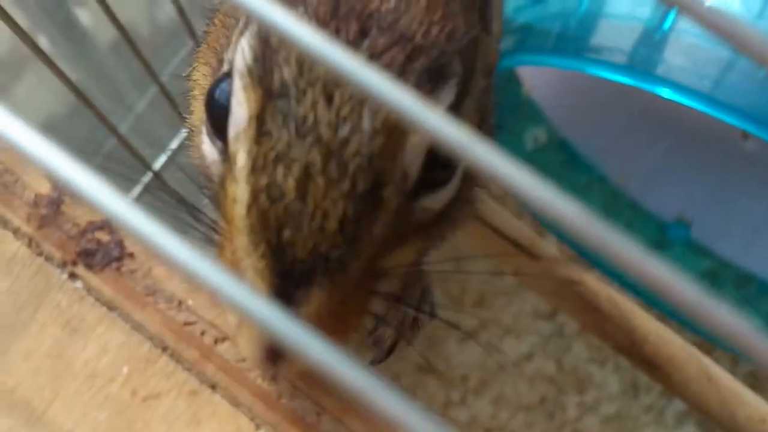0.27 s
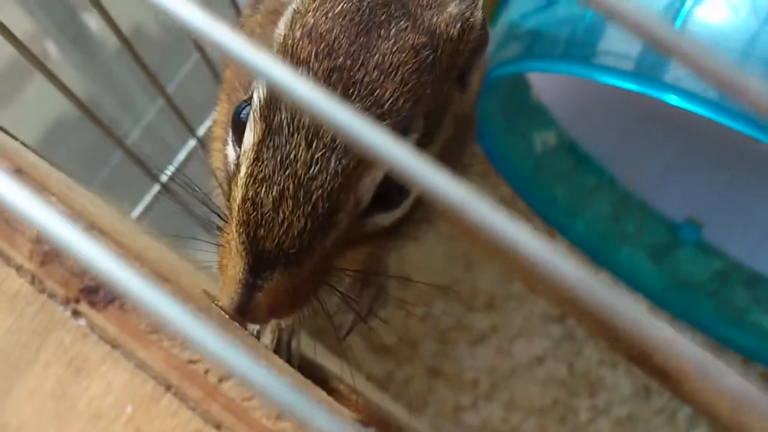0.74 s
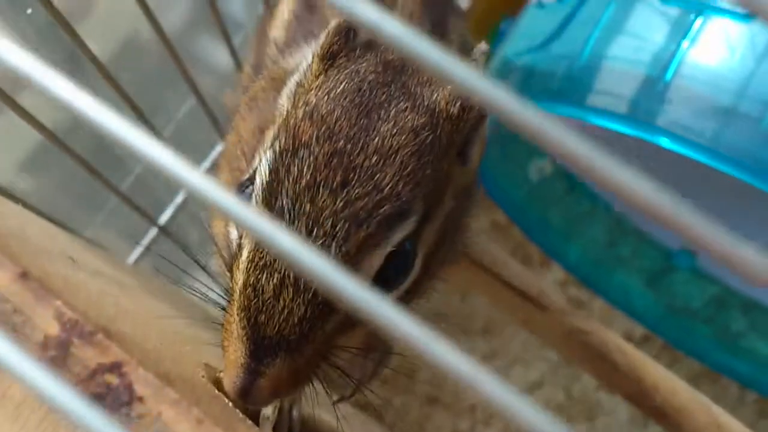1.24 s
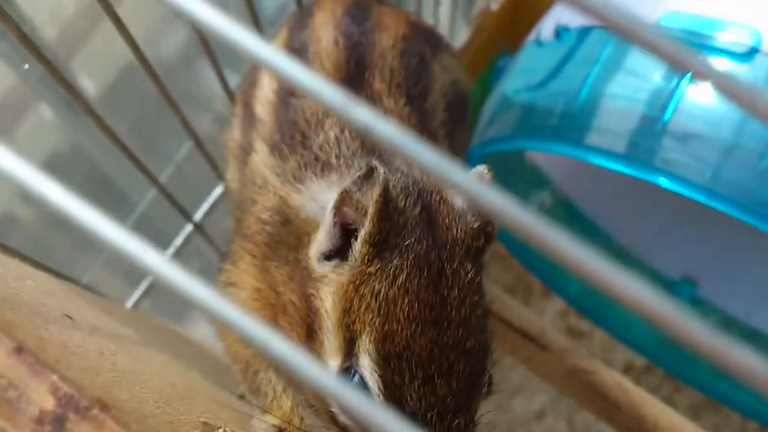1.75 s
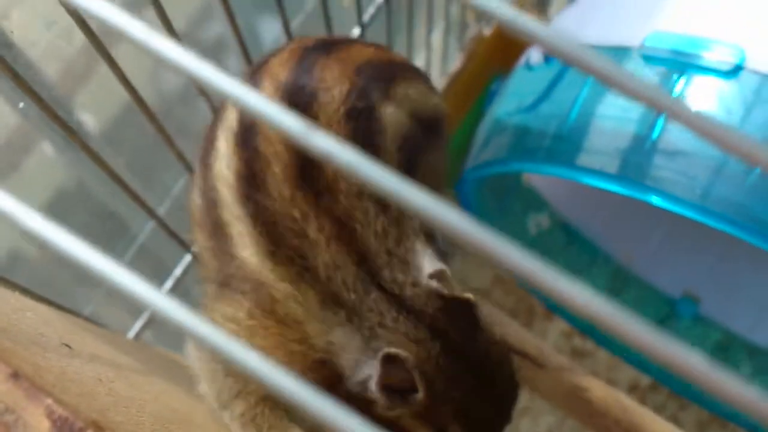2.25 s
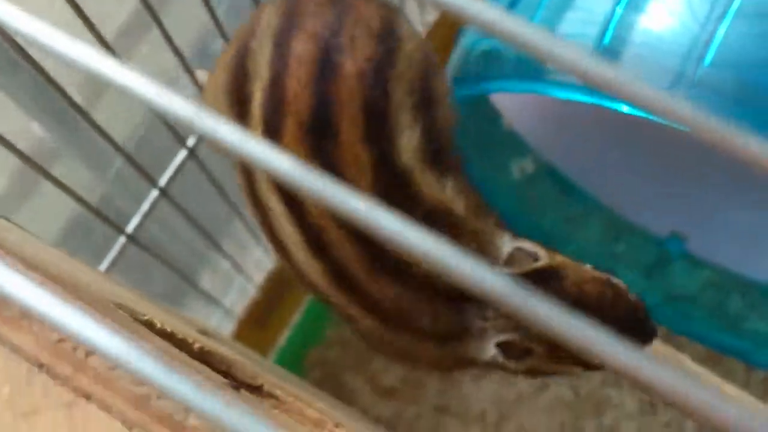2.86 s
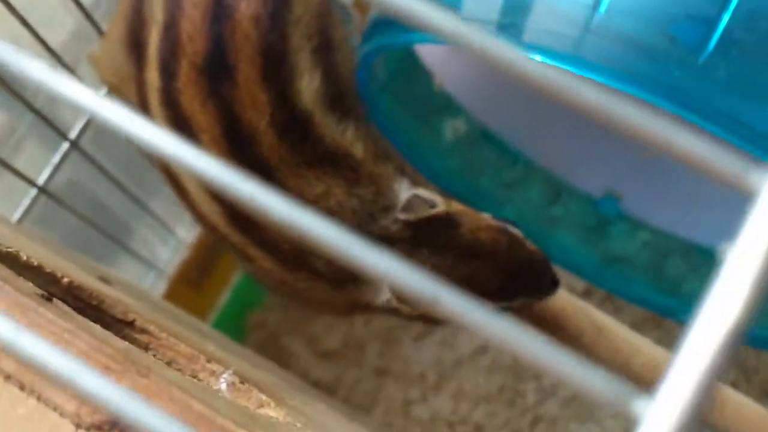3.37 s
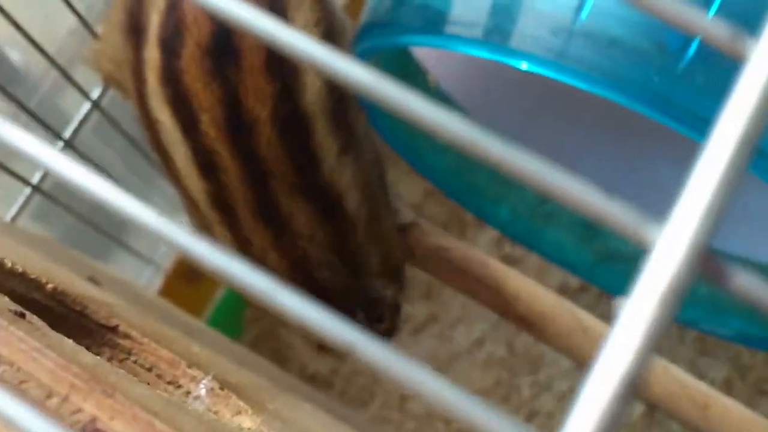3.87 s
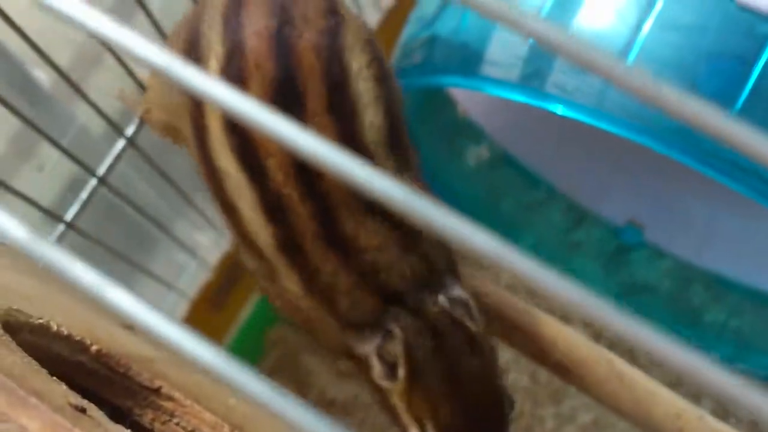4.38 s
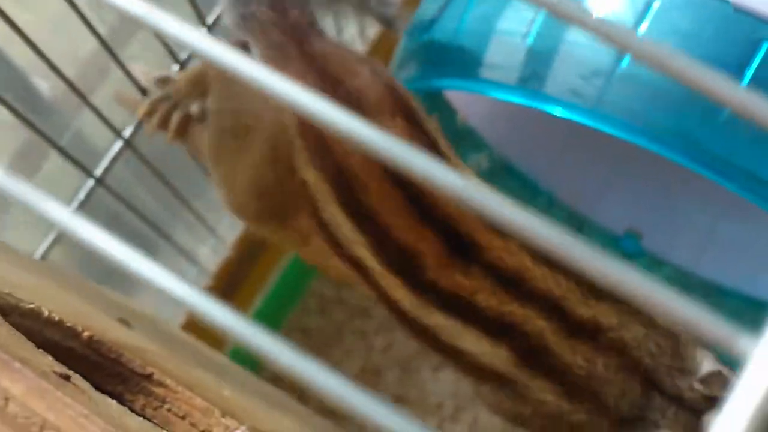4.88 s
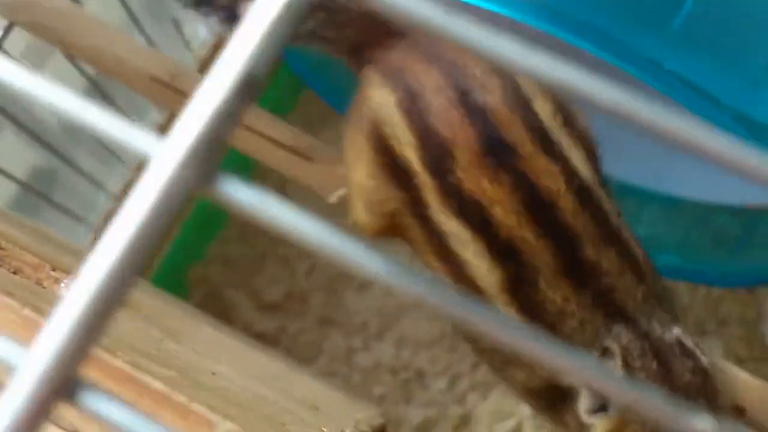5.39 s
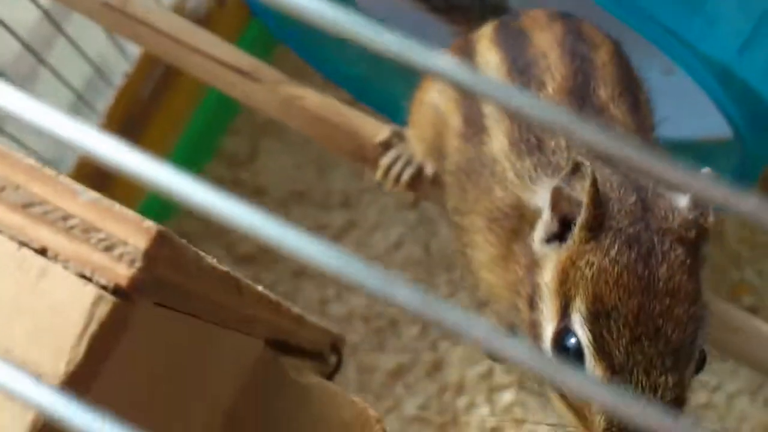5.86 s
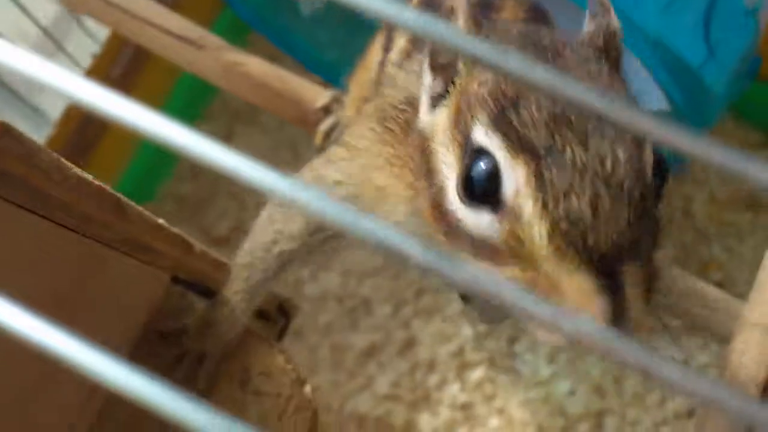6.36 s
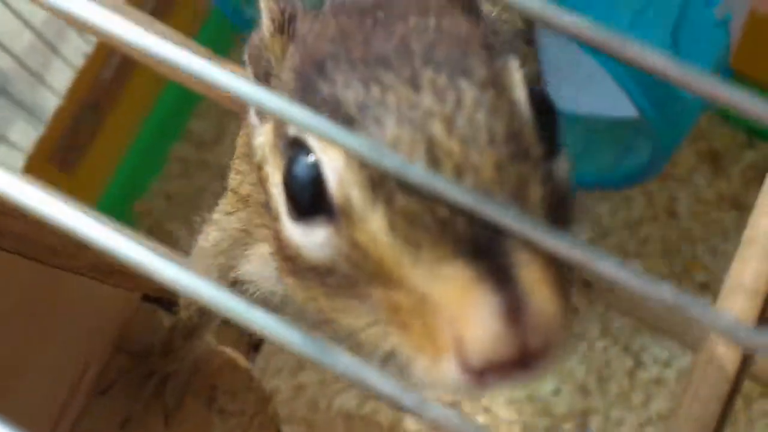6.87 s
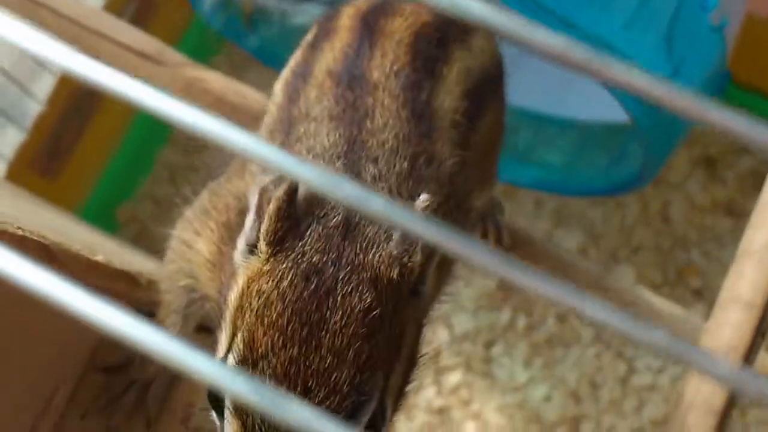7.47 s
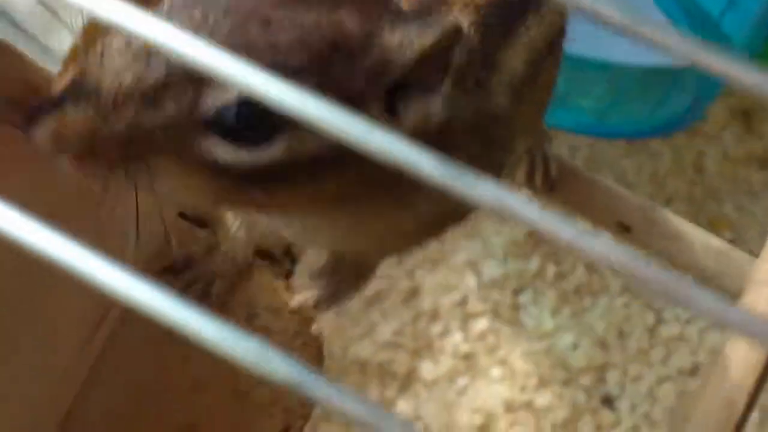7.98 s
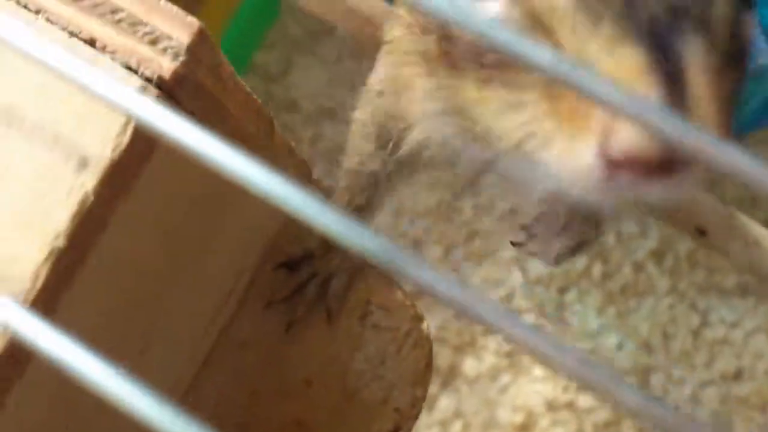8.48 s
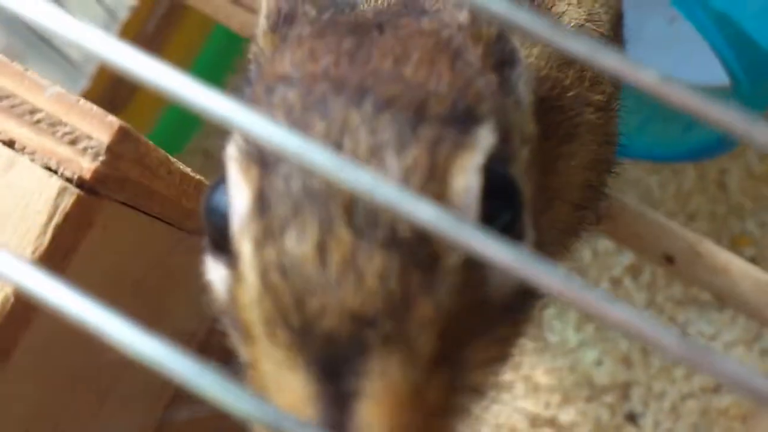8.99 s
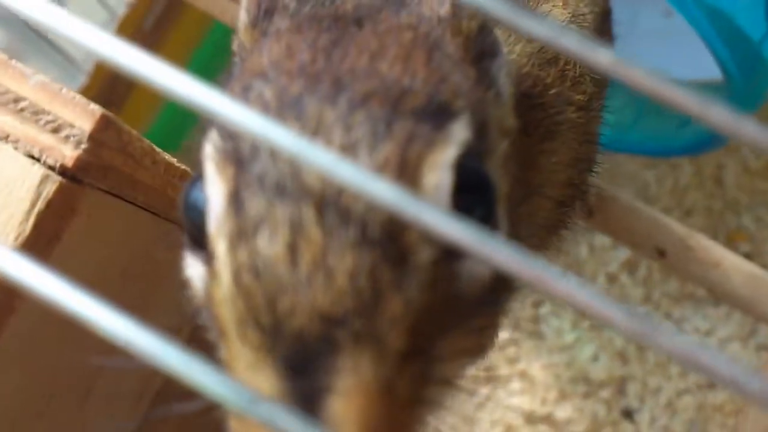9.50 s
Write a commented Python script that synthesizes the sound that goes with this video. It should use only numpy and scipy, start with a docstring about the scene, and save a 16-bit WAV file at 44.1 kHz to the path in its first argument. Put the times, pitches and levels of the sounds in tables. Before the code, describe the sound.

An agitated small rodent calls near the microphone, alternating noisy throat rasps with thin, bending squeaks. Calls arrive in irregular clusters, with near-silent pauses showing low room rumble, hiss and very faint hum. Soft body bumps and weak whines sit in the lulls. The loudest squeak comes past midway; strong rasps and crisp claw clicks dominate later, ending on faint whines and a couple of squeaks. The small room sounds close and slightly lively.

```python
"""Chipmunk scolding in a wire cage

Close by in a small room, harsh rasping chirps alternate with gliding squeaks and a few faint whines.
Rasps are noise puffs from a slapping throat; squeaks and whines are overtone stacks on bending pitch paths.
Claws and teeth tick as short noise cracks and the body bumps the floor as decaying sines.
Cage walls and room answer with decaying noise, over drifting rumble and hiss and a wavering low hum.
"""
import sys
import numpy as np
from scipy import signal
from scipy.fft import rfft, irfft, next_fast_len
from scipy.io import wavfile
from scipy.ndimage import uniform_filter1d, minimum_filter1d, map_coordinates

SR = 44100
rng = np.random.default_rng(int(sys.argv[2]) if len(sys.argv) > 2 else 0)


def inscribe(sig):
    """Save sig as 16-bit PCM at rate SR to the path in sys.argv[1].

    A 1-D sig is mono; a 2-D sig holds one channel per row.
    Samples are clipped to [-1, 1] before scaling.
    """
    pcm = np.round(np.clip(np.atleast_2d(sig).T, -1, 1) * 32767)
    wavfile.write(sys.argv[1], SR, pcm.astype(np.int16))


N = 429534
TOP_HZ = 16000  # upper limit of the overtones and of the whole sound


def amp(db):
    """Decibels to gain."""
    return 10 ** (np.asarray(db) / 20)


def unit(x):
    """Scale to rms 1."""
    return x / np.sqrt(np.mean(x ** 2) + 1e-20)


def along(points, hz):
    """(Hz, value) points on a log axis."""
    f, v = np.transpose(points)
    return np.interp(np.log(hz + 1), np.log(f + 1), v)


def wobble(rate, n):
    """A smooth random curve, rate knots a second."""
    knots = rng.standard_normal(8192)
    return map_coordinates(knots, [np.arange(n) * rate / SR], mode="wrap")


def filtered(x, response):
    """x times a response of frequency."""
    n = x.shape[-1]
    m = next_fast_len(n + 2048)
    return irfft(rfft(x, m) * response(np.fft.rfftfreq(m, 1 / SR)), m)[..., :n]


def add(track, s, x):
    """Mix x into the track at time s."""
    i = max(0, round(s * SR))
    track[i:i + len(x)] += x[:N - i]


def room_air(air_db=-54.5, drift_db=.6, split_hz=1000, waver_db=3):
    """Soft rumble and hiss that drift in level, each on its own, over a wavering hum."""
    # colour of the air noise: f/Hz, relative level/dB
    air_colour = [(12, -20), (20, 11), (81, -9.5), (142, -2), (337, -12), (422, -6), (624, -11.5),
                  (900, -7.5), (2140, -16.5), (6910, -22.5), (9000, -16.5), (16000, -32)]
    # likeness of the two channels: f/Hz, left-right correlation (-1 to 1)
    alike = [(30, 0.92), (250, 0.82), (600, 0.63), (1500, 0.093), (10000, 0.021)]
    # hum tones: f/Hz, level around which each wavers/dB rms
    hum_tones = [(120, -73.5), (180, -78.5)]

    def mid_side(hz):
        # more side against mid makes the channels less alike
        turn = np.arccos(np.clip(along(alike, hz), -1, 1)) / 2
        return amp(along(air_colour, hz)) * [np.cos(turn), np.sin(turn)]

    mid, side = filtered(rng.standard_normal((2, N)), mid_side)
    air = unit(np.array([mid + side, mid - side]))
    rumble = filtered(air, lambda hz: hz < split_hz)
    hiss = air - rumble
    air = sum(band * amp(drift_db * wobble(3.115, N)) for band in (rumble, hiss))
    t = np.arange(N) / SR
    hum = np.zeros(N)
    for hz, db in hum_tones:
        level = amp(db + waver_db * wobble(12.0, N))
        hum += level * np.sqrt(2) * np.sin(2 * np.pi * hz * t + wobble(2.0, N))
    return amp(air_db) * air + hum


def bumps(decay=0.021, attack=0.00019):
    """The body bumps the cage floor, which gives one dull, short ring: a sine dying away (times in s)."""
    # soft bumps: t/s, source amplitude before the envelope/dB, f/Hz
    thuds = [(1.186, -49, 409), (1.727, -50.5, 206), (2.766, -48, 400), (3.395, -47, 404)]
    out, t = np.zeros(N), np.arange(SR // 5) / SR
    for s, db, hz in thuds:
        envelope = np.exp(-t / decay) * (1 - np.exp(-t / attack))
        add(out, s, amp(db) * np.sin(2 * np.pi * hz * t) * envelope)
    return out


def ticks(decay=0.0023):
    """Each contact of claws or teeth is a dry crack: coloured noise dying in a few milliseconds (decay in s)."""
    # sharp contacts: t/s, source level before the decay/dB rms
    contacts = [(1.707, -41.5), (2.468, -34), (2.817, -38), (4.084, -23), (5.809, -23.5), (7.225, -25.5),
                (7.878, -19.5), (8.049, -23.5), (8.065, -17), (8.07, -17), (8.8895, -19.5), (8.907, -20.5),
                (9.0572, -23.5), (9.0698, -26)]
    # colour of a crack: f/Hz, relative level/dB
    crack_colour = [(400, -30), (1500, 1), (3000, 20), (8500, 17), (11500, -23), (16000, -46)]
    out, t = np.zeros(N), np.arange(SR // 20) / SR
    for s, db in contacts:
        crack = unit(filtered(rng.standard_normal(len(t)), lambda hz: amp(along(crack_colour, hz))))
        add(out, s, amp(db) * crack * np.exp(-t / decay))
    return out


def glides(notes, colour, overtones_db, jitter, flutter_db, rasp_db, attack, release, warble, half_db,
           shiver=0.014, flare_db=-1.5):
    """Notes bend along pitch paths with overtones; strain flutters pitch and size and adds a pulsing hiss."""
    out = np.zeros(N)
    for rough, bright_db, path in notes:
        times, hz, db = np.transpose(path)
        times, rough = np.sort(times), np.clip(rough, 0, 1)
        end = times[-1] + release
        t = np.arange(times[0] - attack, end, 1 / SR)
        n = len(t)
        pitch, level = np.interp(t, times, hz), np.interp(t, times, db)

        # fast jitter and slower warble of the pitch, both growing with roughness
        unsteady = (shiver + rough * jitter) * wobble(1098.0, n)
        unsteady = unsteady + (shiver + rough * warble) * wobble(246.6, n)
        phase = 2 * np.pi * np.cumsum(pitch * np.exp(unsteady)) / SR

        def partial(k):
            # low notes put their overtones into the head's resonances and sound reedier
            resonance = amp(along(colour, k * pitch) - along(colour, pitch))
            return np.sin(k * phase) * resonance * (k * pitch < TOP_HZ)

        # the overtones flare and fade as the vocal folds close more or less tightly
        tone = partial(1)
        for k, overtone_db in enumerate(overtones_db, 2):
            tone = tone + amp(bright_db + overtone_db + flare_db * wobble(112.0, n)) * partial(k)
        # under strain alternate cycles differ, giving a line halfway to the octave
        tone = tone + amp(half_db) * rough * partial(3 / 2)
        tone = tone * np.sqrt(2) * amp(flutter_db * rough * wobble(488, n))

        noise = rng.standard_normal(SR // 2)[:n]
        hiss = unit(filtered(noise, lambda f: amp(along(colour, f)) * (f > pitch.min())))
        pulsing_hiss = amp(rasp_db) * rough ** 2 * hiss * (1 + np.cos(phase))
        # both the fade-in and the fade-out last one attack time
        gate = np.clip(np.minimum(t - t[0], end - t) / attack, 0, 1)
        add(out, t[0], gate * amp(level) * (tone + pulsing_hiss))
    return out


def whines():
    """Low nasal notes: strong overtones shaped by the nose, with slow fades and a noisy rasp under strain."""
    # one note a row: roughness (0-1), overtone strength/dB, path of (t/s, f/Hz, source level/dB)
    nasal_notes = [(.42, 12, [(2.68, 1190, -60), (2.705, 1150, -54), (2.74, 1100, -61)]),
                   (.42, 6, [(2.872, 1090, -52), (2.9, 1010, -49), (2.93, 940, -57)]),
                   (.24, -3, [(3.03, 1680, -52), (3.06, 1400, -56), (3.125, 1320, -55), (3.18, 1500, -54)]),
                   (.26, -4, [(9.045, 1650, -60), (9.15, 1000, -47), (9.21, 1200, -56),
                   (9.222, 2300, -53)]), (.35, -2, [(9.236, 1700, -48), (9.28, 1470, -45),
                   (9.345, 1570, -63)])]
    # resonances of the nose: f/Hz, relative level/dB
    nose = [(1000, -4.5), (1600, -3), (2600, -2.5), (4500, 1.5), (6000, -9), (9000, -6), (16000, -36)]
    return glides(nasal_notes, nose, overtones_db=[-10.5, -11.5, -19.0, -27],
                  jitter=.04, flutter_db=4, rasp_db=17, attack=.014, release=.02, warble=.008, half_db=-3)


def squeaks():
    """Quick gliding cries through the mouth, plus thin whistles that sound inside harsh chirps."""
    # one squeak a row: roughness (0-1), overtone strength/dB, path of (t/s, f/Hz, source level/dB)
    cries = [ (0.246, -1, [(.325, 4050, -30), (.348, 3600, -33), (.362, 2840, -31.5), (.398, 1445, -38)]),
             (0.405, 1, [(.397, 3090, -29.5), (.417, 3470, -35), (.428, 2586, -33), (.438, 2480, -33)]),
             (.14, 2, [(.468, 3150, -29), (.48, 3620, -25), (.5, 3780, -20), (.511, 2880, -24),
             (.535, 2650, -19), (.547, 2300, -27)]), (.7, 5, [(.548, 2540, -27), (.558, 3000, -27)]),
             (0.15, -3, [(.818, 3097, -19), (.835, 2754, -17.5), (.849, 2210, -25.5)]),
             (.3, -3, [(1.405, 3550, -35), (1.415, 3300, -29), (1.419, 2400, -33)]),
             (.11, -1, [(1.424, 2250, -31), (1.452, 2700, -24), (1.48, 3020, -23.5), (1.489, 2700, -24),
             (1.497, 2380, -33), (1.506, 2250, -32)]), (0.16, 10.5, [(1.507, 2130, -41),
             (1.526, 1967, -38)]), (0.24, 6, [(2.008, 3360, -49), (2.027, 1644, -42), (2.04, 1500, -46)]),
             (0.12, 8, [(2.056, 2270, -36), (2.08, 2140, -43.5)]), (0.15, 6, [(2.09, 3400, -36),
             (2.108, 2870, -34), (2.131, 2210, -37.5)]), (0.093, 7.5, [(2.136, 1750, -42),
             (2.165, 1945, -49.5), (2.2, 1664, -49.5), (2.228, 2120, -49)]), (.2, 5, [(2.254, 2340, -35),
             (2.267, 2240, -38)]), (0.13, 8, [(3.43, 3030, -43.5), (3.45, 2890, -48)]),
             (0.41, -10, [(3.466, 1940, -48), (3.479, 3300, -34.5), (3.501, 1484, -43),
             (3.524, 3040, -38)]), (0.074, 6, [(3.527, 2930, -35), (3.548, 3156, -35), (3.575, 2814, -33),
             (3.605, 2910, -28), (3.638, 2660, -29)]), (.35, -6, [(3.643, 2548, -36), (3.665, 2000, -34),
             (3.705, 2260, -26)]), (0.43, 5, [(3.686, 3400, -27), (3.725, 3490, -22)]),
             (0.12, -3, [(4.213, 3180, -32), (4.24, 3140, -46), (4.268, 3100, -30), (4.31, 3130, -41)]),
             (0.14, 4.5, [(5.257, 4540, -43), (5.265, 3170, -37), (5.277, 3120, -26), (5.296, 3050, -31.5),
             (5.32, 2580, -28)]), (.4, -8, [(5.324, 2895, -26), (5.35, 2400, -18)]),
             (0.16, -4, [(5.364, 3097, -6.5), (5.416, 2965, -16)]), (0.19, 5, [(5.42, 2780, -21),
             (5.44, 2390, -27.5), (5.463, 2380, -27.5), (5.47, 3810, -23), (5.481, 3840, -23)]),
             (0.334, 4, [(5.597, 4030, -39.5), (5.612, 3870, -38), (5.636, 3050, -42), (5.652, 2425, -36.5),
             (5.665, 1600, -43)]), (0.17, 4, [(5.672, 3495, -27), (5.682, 3080, -34), (5.69, 2250, -45),
             (5.703, 2370, -38), (5.712, 2530, -24)]), (0.053, 0, [(5.721, 2610, -34), (5.729, 3440, -27),
             (5.754, 3426, -18), (5.769, 2880, -26.5), (5.784, 3230, -45)]),
             (0.27, -14, [(6.173, 3640, -38), (6.187, 3550, -40.5), (6.199, 2520, -45)]),
             (0.32, -1, [(6.207, 2690, -37), (6.228, 2900, -36), (6.235, 1860, -35), (6.244, 1670, -42)]),
             (0.25, 0, [(6.24, 3640, -36), (6.251, 3200, -36), (6.287, 2640, -32), (6.295, 1710, -39),
             (6.316, 1580, -54)]), (0.23, 3, [(6.318, 3030, -28), (6.326, 3133, -29), (6.35, 3000, -32),
             (6.369, 2290, -34), (6.398, 1520, -47)]), (0.24, -0.5, [(6.406, 3214, -29), (6.435, 2496, -34),
             (6.452, 2725, -34.5)]), (.18, -3, [(6.785, 3750, -42), (6.81, 2800, -50)]),
             (.13, 5, [(6.841, 3000, -40), (6.859, 2850, -29), (6.872, 2450, -30), (6.893, 2720, -30)]),
             (.3, -1, [(6.898, 2550, -29), (6.908, 2700, -25), (6.921, 2550, -29), (6.929, 3400, -28)]),
             (.15, 9, [(7.22, 2230, -39), (7.235, 2200, -35), (7.243, 1720, -42)]),
             (.25, -3, [(7.284, 3600, -25), (7.342, 3000, -31)]), (.25, -1, [(9.489, 4550, -37),
             (9.503, 3550, -36), (9.518, 3050, -47)]), (.17, 1, [(9.542, 2380, -38), (9.557, 2550, -29),
             (9.568, 3060, -27), (9.613, 3040, -23), (9.626, 2650, -29), (9.645, 2500, -34)])]
    # one whistle a row: roughness (0-1), overtone strength/dB, path of (t/s, f/Hz, source level/dB)
    whistles = [(0.19, 6.5, [(.175, 3750, -20), (.24, 4810, -19)]), (0.1, -7, [(8.263, 6610, -16),
                (8.37, 6900, -11.5)])]
    # resonances of the mouth: f/Hz, relative level/dB
    mouth = [(1500, 4.5), (2400, 0.5), (3300, 13), (4400, 5), (5600, -1), (7000, 2.5), (8800, 8),
             (10000, 1.5), (11500, -20), (16000, -13)]
    return glides(cries + whistles, mouth, overtones_db=[-14, -23, -31], jitter=0.136, flutter_db=9.5,
                  rasp_db=-16.0, attack=0.0029, release=0.0016, warble=0.069, half_db=-15.5)


def rasps(flap_hz=205, jitter=.22, pulse_decay=0.14, leak=0.22, fall=0.0046, low_hz=2000, high_hz=4500,
          close_hz=7200, close_db=-6, slap_db=3.5, shift_db=3.5):
    """The throat slaps shut at uneven times and strengths; each slap rings a puff of noise through the mouth."""
    # harsh chirps: t/s, time until the fall/s, rise/s, then source level before shaping of the
    # low band/dB, middle band/dB, high hiss/dB
    chirps = [(0, .025, 0.00032, -51.5, -28.5, -18), (0.121, 0.093, 0.043, -52, -24, -16.5),
              (.705, 0.13, 0.027, -61, -25.5, -19), (0.986, 0.062, 0.011, -43.5, -23, -15.5),
              (1.28, 0.034, 0.022, -46.5, -35, -37), (1.307, 0.019, 0.0046, -46, -22.5, -14),
              (3.672, 0.038, 0.014, -66, -30, -35.5), (4.064, 0.039, 0.023, -43, -31, -27.5),
              (4.213, 0.1, 0.00091, -61, -35, -25.5), (4.435, 0.06, 0.0055, -46.5, -36.5, -33),
              (4.767, 0.038, 0.065, -42, -28.5, -36), (5.064, 0.078, 0.019, -51.5, -42, -46),
              (5.324, 0.035, 0.051, -69, -15, -22.5), (5.436, 0.028, 0.019, -57, -31, -33),
              (6.923, 0.0039, 0.0013, -55, -46, -40.5), (7.095, 0.04, 0.042, -41, -30.5, -28.5),
              (7.262, 0.053, 0.04, -49, -27, -29.5), (7.408, 0.078, 0.0066, -46.5, -22.5, -17),
              (7.585, 0.088, 0.018, -44, -18, -10), (7.883, 0.063, 0.001, -54, -29.5, -20.5),
              (8.068, 0.071, 0.0022, -48.5, -26, -14.5), (8.258, .11, 0.0062, -48, -22, -12),
              (8.646, 0.083, 0.011, -51, -33.5, -29.5), (8.688, 0.014, 0.0027, -43, -32.5, -20.5),
              (8.886, 0.016, 0.0003, -72, -44, -23), (9.065, 0.014, 0.002, -62, -41, -27.5)]
    # colour of the harsh voice: f/Hz, relative level/dB
    voice_colour = [(350, -63), (600, -52), (737, -14), (1550, -2.5), (2150, -12), (2650, -8), (3210, -8),
                    (5400, -6.5), (8600, -8), (9900, -15.5), (11700, -30), (13800, -28), (16000, -52)]
    out, t = np.zeros(N), np.arange(SR // 4) / SR
    n = len(t)
    for s, length, rise, low_db, middle_db, hiss_db in chirps:
        cycle = np.cumsum(flap_hz * np.exp(jitter * wobble(150, n))) / SR
        slap = amp(slap_db * rng.standard_normal(512))[cycle.astype(int) % 512]
        # each puff dies over a fraction of its cycle, above a steady leak of breath
        puffs = (leak + slap * np.exp(-(cycle % 1) / pulse_decay)) * rng.standard_normal(n)

        # random narrow bands swell and fade within each chirp, making its noise uneven
        z = signal.stft(puffs, nperseg=256)[2]
        shifts = uniform_filter1d(rng.standard_normal(z.shape), size=2, axis=0)
        shifts = unit(uniform_filter1d(shifts, size=10, axis=1))
        source = signal.istft(z * amp(shift_db * shifts), nperseg=256)[1][:n]
        voice = filtered(source, lambda hz: amp(along(voice_colour, hz)))

        chirp = np.zeros(n)
        for lo, hi, db in ((800, low_hz, low_db), (low_hz, high_hz, middle_db), (high_hz, SR, hiss_db)):
            band = filtered(voice, lambda hz: 1 / (1 + (lo / (hz + 1)) ** 10) / (1 + (hz / hi) ** 10))
            chirp += amp(db) * unit(band)
        # the mouth closes as the chirp goes on, so its top dulls
        top = filtered(chirp, lambda hz: 1 / (1 + (close_hz / (hz + 1)) ** 10))
        top_gain = amp(close_db * (np.minimum(t / length, 1) - .5))
        chirp += top * (top_gain - 1)
        swell = np.clip(t / rise, 0, 1) * np.exp(-np.maximum(t - length, 0) / fall)
        add(out, s, chirp * swell)
    return out


def space(x, spread, direct_db=-3.0, lag=0.0002446, cage_db=-1.5, cage_decay=0.0027, room_db=1.0):
    """Direct sound reaches the right port first; cage walls and room answer with decaying noise."""
    # how much louder the left is than the right as the animal moves: t/s, gain difference/dB
    left = [(0, 3.5), (1.5, 3), (2.3, 11.5), (3.598, 4), (6.2, 6.5), (8.2, 0.9), (9, 5)]
    # reverberation of the room: f/Hz, time to fall by 60 dB/s
    room = [(300, 0.12), (2500, 0.24), (6000, 0.27), (10000, 0.22), (15000, 0.19)]
    side = np.array([[1], [-1]])  # left, right
    left_db = np.interp(np.arange(N) / SR, *np.transpose(left))
    # the lag (s) is split between the ports: left late, right early
    out = amp(direct_db) * filtered(x, lambda hz: np.exp(-1j * np.pi * hz * lag * side))
    hop, t = SR // 3, np.arange(SR // 2) / SR
    padded = np.pad(spread, (hop, 2 * hop))
    for start in range(-hop, N, hop):
        # the answer is redrawn every third of a second, each fading into the next
        piece = padded[start + hop:][:2 * hop] * signal.windows.cosine(2 * hop)
        hz, age, z = signal.stft(rng.standard_normal((2, len(t))), SR, nperseg=256)
        fading = z * amp(-60 * age / along(room, hz)[:, None])
        tail = signal.istft(fading, SR, nperseg=256)[1][:, :len(t)]
        tail = tail * (1 - np.exp(-t / 0.00018))
        # the cage walls answer after a short gap
        walls = rng.standard_normal(tail.shape) * np.exp(-t / cage_decay) * (t > .0008)
        answer = amp(room_db) * tail / np.linalg.norm(tail[0])
        answer = answer + amp(cage_db) * walls / np.linalg.norm(walls[0])
        for channel in range(2):
            reply = signal.fftconvolve(piece[max(0, -start):], answer[channel])
            add(out[channel], start / SR, reply)
    return out * amp(side * left_db / 2)


def scene(squeak_room_db=-5):
    """The animal's sounds in cage and room; the squeaks stir the room less than the harsh chirps."""
    air = room_air()
    others = bumps() + ticks() + whines() + rasps()
    cries = squeaks()
    return space(others + cries, others + amp(squeak_room_db) * cries) + air


def record(dry, ceiling_db=-21, window=0.0077, hold=0.009):
    """The camera's limiter flattens the loudest chirps (times in s); nothing sounds above 16 kHz."""
    power = np.abs(uniform_filter1d(np.mean(dry ** 2, axis=0), max(1, int(window * SR))))
    # a soft knee around the ceiling (dB rms)
    needed = (1 + (power / amp(ceiling_db) ** 2) ** 2 / 2) ** -.25
    span = max(1, int(hold * SR))
    gain = uniform_filter1d(minimum_filter1d(needed, span), span)
    return filtered(dry * gain, lambda hz: hz < TOP_HZ)


dry = scene()
out = record(dry)
inscribe(out)
```